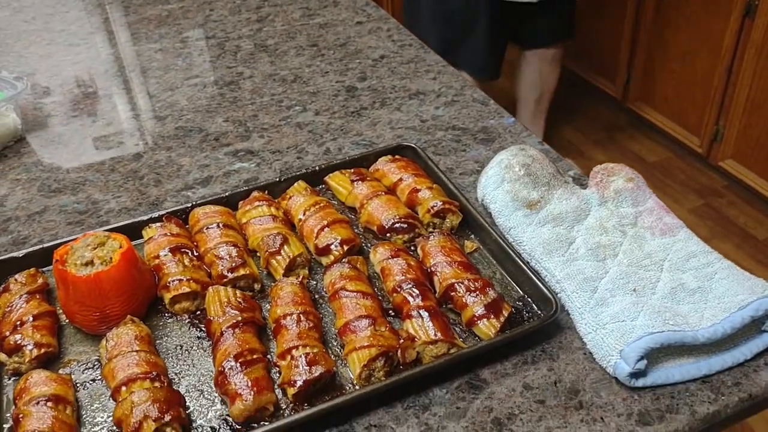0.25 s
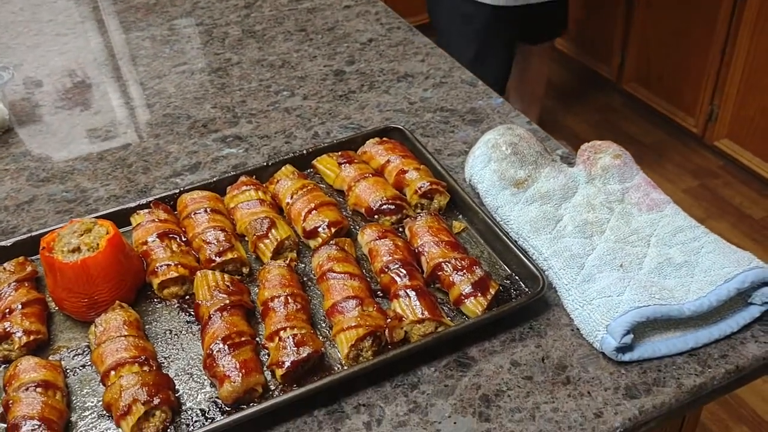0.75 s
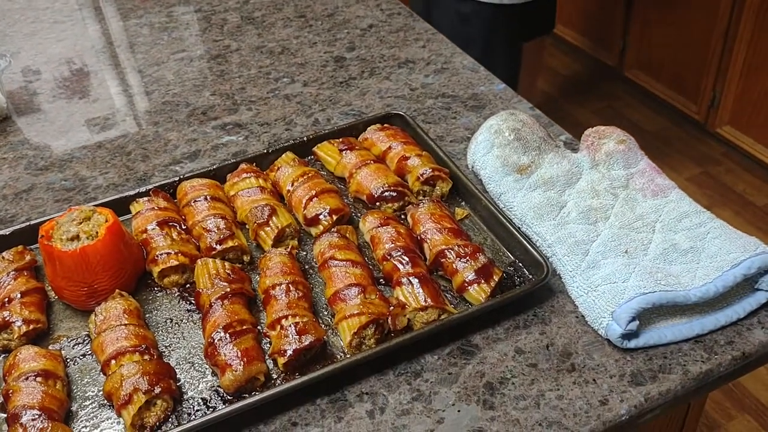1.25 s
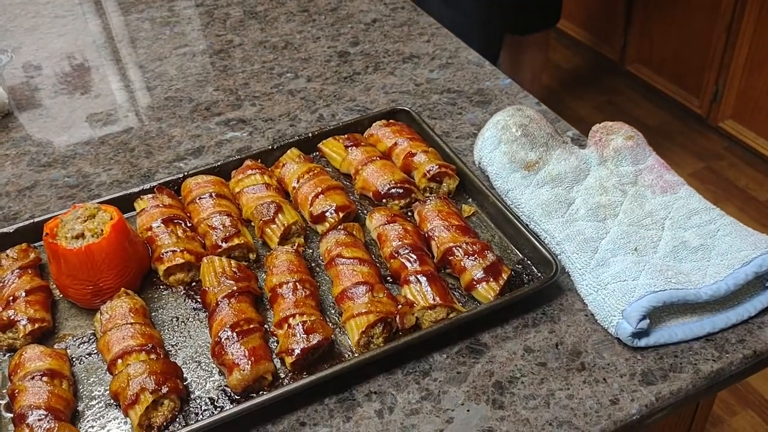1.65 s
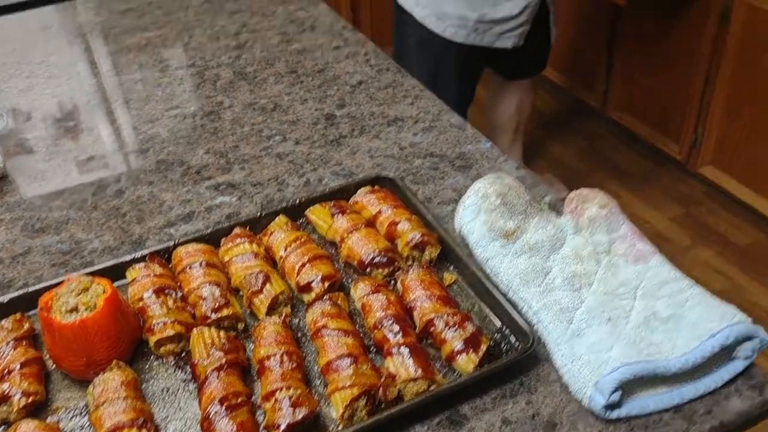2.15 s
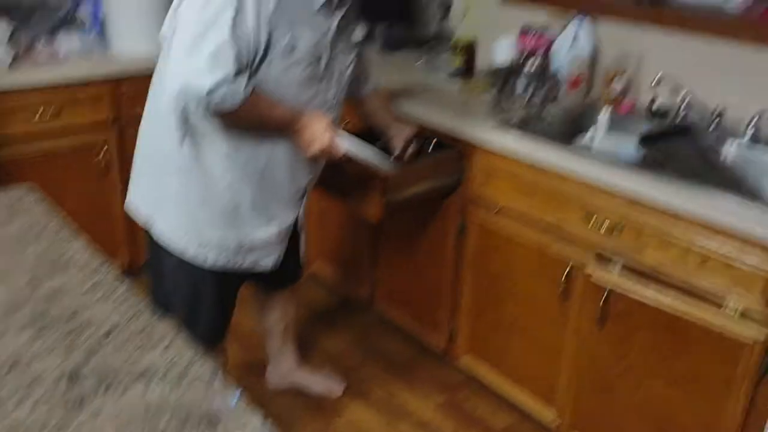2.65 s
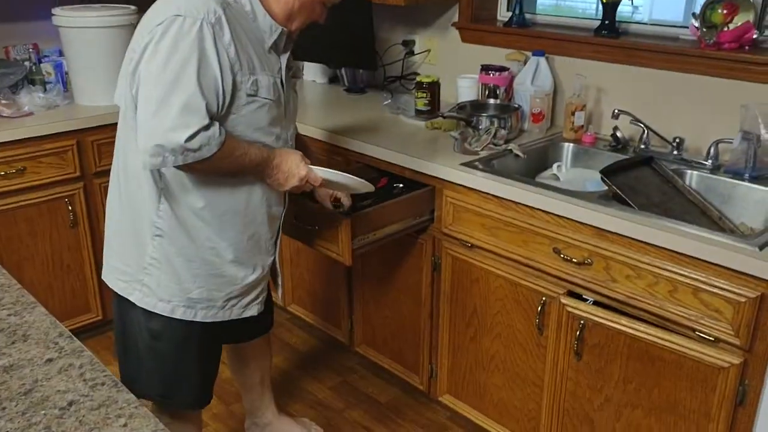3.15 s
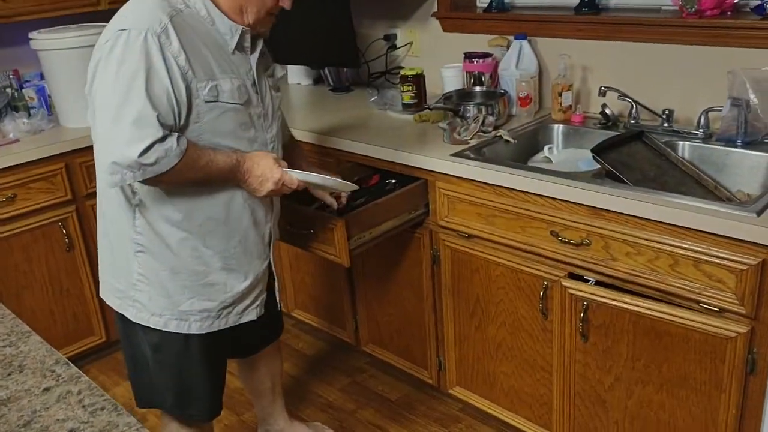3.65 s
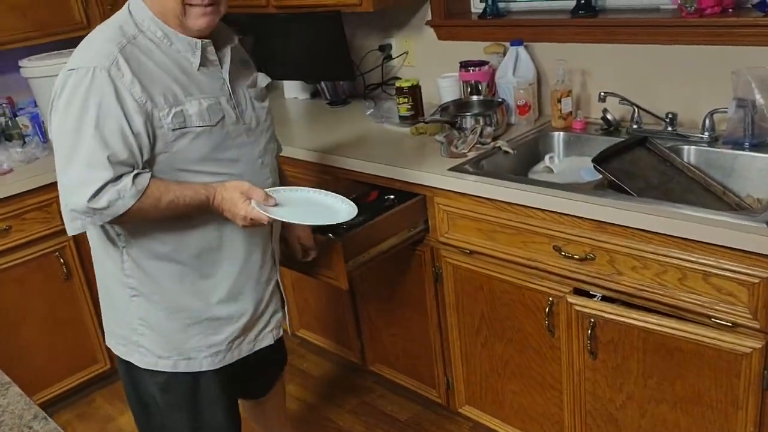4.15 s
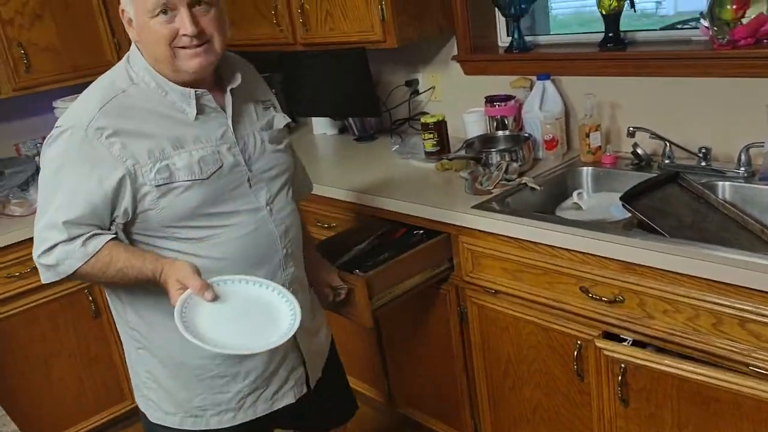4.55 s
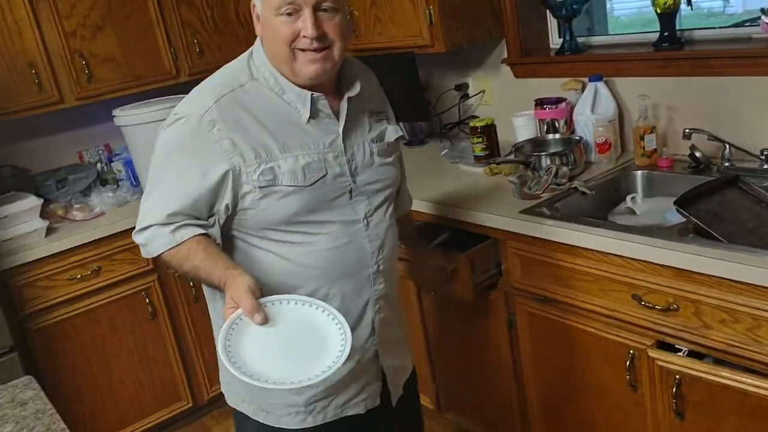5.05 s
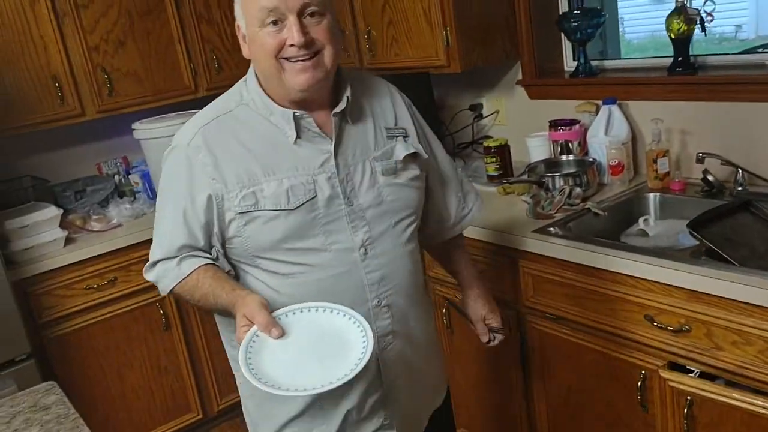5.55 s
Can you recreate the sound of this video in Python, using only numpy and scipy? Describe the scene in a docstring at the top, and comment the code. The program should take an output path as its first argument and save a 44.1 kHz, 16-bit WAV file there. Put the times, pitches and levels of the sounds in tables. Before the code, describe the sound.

Someone opens a wooden cutlery drawer, stirs through rattling steel pieces, and shuts it with a hard thud in a small kitchen.

```python
"""A small hard kitchen: a wooden drawer is pulled open, a hand rummages in the cutlery, the drawer is pushed shut.
Trains of tiny contacts, shaped by spectra, make the boom and clatter of the box and the hiss and scrape of steel.
Noise bursts through the modes of the box make knocks; struck modes, decaying sines and gliding rough tones
make the rattle, rings and squeaks, and short bursts make the ticks. Steady air noise and two sines are
the room with its refrigerator; feedback delays reverberate the knocks and ticks."""
import sys
import numpy as np
from scipy import signal
from scipy.fft import rfft, irfft, next_fast_len
from scipy.io import wavfile

SR = 44100
rng = np.random.default_rng(int(sys.argv[2]) if len(sys.argv) > 2 else 0)


def to_wav(sig):
    """Store sig (one row per channel, or 1-D mono) as 16-bit WAV at the path in sys.argv[1].

    Samples outside -1..1 are clipped; the rate is SR.
    """
    pcm = np.clip(np.atleast_2d(sig), -1, 1) * 32767
    pcm = np.round(pcm).astype(np.int16)
    wavfile.write(sys.argv[1], SR, pcm.T)  # frames by channels


N = 256123

# Resonances of the wooden box. Each row: frequency in Hz, width in Hz, level in dB.
BOX_MODES = [(75, 56, -54), (149, 24, -4), (174, 5.7, -8.5), (232.4, 18, 2), (298, 43, 4.5),
             (330, 34, -29.5), (400, 7, -24.5), (528, 12, -14.5), (642, 43, -19.5), (844, 200, 6.5),
             (985, 61, -4), (1175, 32, -13), (1660, 45, -29.5), (1910, 15, -10), (2120, 93, -6.5),
             (2338, 230, -12.5)]


def from_db(db):
    """Amplitude factor for a level in dB."""
    return 10 ** (np.asarray(db) / 20)


def rms_one(x):
    """Scale a sound to an rms of 1."""
    return x / np.sqrt(np.mean(x ** 2) + 1e-20)


def in_time(rows):
    """Draw straight lines through rows of (seconds, values..), one curve a column."""
    seconds, *columns = np.transpose(rows)
    return [np.interp(np.arange(N) / SR, seconds, column) for column in columns]


def at_hz(points, hz):
    """Read a curve of (Hz, value) along a logarithmic frequency axis."""
    point_hz, values = np.array(points).T
    return np.interp(np.log(hz), np.log(point_hz), values)


def panned(x, pan_db):
    """Left and right, with the left louder than the right by pan_db."""
    return x * from_db(np.multiply.outer([.5, -.5], pan_db * np.ones(N)))


def filtered(x, order, hz, kind):
    """Butterworth filter of the given kind, with its corner or corners in Hz."""
    return signal.sosfilt(signal.butter(order, hz, kind, fs=SR, output="sos"), x)


def ring(clicks, hz, t60):
    """A two-pole resonator: a unit click sets a decaying sine of starting height about 1 ringing."""
    radius, angle = from_db(-60 / (t60 * SR)), 2 * np.pi * hz / SR
    poles = [1, -2 * radius * np.cos(angle), radius * radius]
    return signal.lfilter([0, np.sin(angle)], poles, clicks + 1e-18)   # tiny offset avoids slow denormals


def ring_box(bumps, above_hz=0):
    """Bumps ring the modes of the box above a frequency; wider modes die sooner."""
    return sum(from_db(db) * ring(bumps, hz, 2.2 / width) for hz, width, db in BOX_MODES if hz > above_hz)


def grains(per_s, spread_db):
    """Random tiny contacts of uneven size and either sign, as a click train."""
    sizes = from_db(spread_db * np.minimum(rng.exponential(1, N), 5))
    signs = rng.choice([-1, 1], N)
    return sizes * signs * (rng.random(N) < per_s / SR)


def coloured(mid, side, spectrum):
    """Two trains shaped to a spectrum and mixed to left and right by their likeness; rms 1."""
    # How alike left and right are. Each row: frequency in Hz, likeness (held to 0-1 below).
    likeness = [(60, 0.5), (180, 1), (550, 0.7), (1650, 0.38), (4970, 0.27), (15000, -2.5)]
    size = next_fast_len(N)
    hz = np.maximum(np.arange(size // 2 + 1) * SR / size, 1)
    alike = np.clip(at_hz(likeness, hz), 0, 1)
    shared = np.sqrt(1 + alike) * rfft(mid, size)
    opposed = np.sqrt(1 - alike) * rfft(side, size) * [[1], [-1]]
    shaped = (shared + opposed) * from_db(at_hz(spectrum, hz))
    return rms_one(irfft(shaped, size)[:, :N])


def rolling(column):
    """Gain of one layer while the drawer rolls, left and right; levels glide from row to row."""
    # The drawer shifts, rolls out, then back in: three lists of rows.
    # Each row: time in seconds, boom of the panels in dB, clatter of the floor in dB, hiss of the runners in dB.
    rolls = [
        [(0.0, -44.5, -44.5, -55), (0.06, -51, -47.5, -74), (0.09, -73, -61, -80), (0.2, -77, -65.5, -100)],
        [(0.40, -59, -66, -95), (0.42, -32.5, -67, -95), (0.56, -45, -47.5, -80), (0.69, -54, -45, -39.5),
         (0.755, -45, -39, -46.5), (0.81, -46, -36.5, -35), (0.86, -38, -35.5, -41), (0.98, -37.5, -37, -35),
         (1.04, -39, -39.5, -41), (1.13, -47, -45, -37.5), (1.36, -54.5, -51, -50), (1.4, -62, -57, -54),
         (1.7, -69, -72.5, -100)],
        [(4.5, -80, -68, -60), (4.57, -70, -60, -60), (4.65, -63, -59, -50), (4.74, -55, -47, -44.5),
         (4.87, -41.5, -41, -37.5), (4.95, -49, -41.5, -41), (4.98, -36.5, -34.5, -38.5), (5.02, -39, -40, -41),
         (5.12, -35.5, -36.5, -44), (5.21, -40, -38.5, -43.5), (5.385, -48.5, -40.5, -56),
         (5.44, -40.5, -40.5, -58), (5.76, -75, -69, -100), (5.78, -70, -73, -100)],
    ]
    level_db = in_time(sum(rolls, []))[column]
    return panned(from_db(level_db), -1)


def stirring(layer):
    """Gain of one layer, left and right: each stir rises, holds and falls; stirs add in power."""
    # The heap is stirred or jolted. Each row: start in seconds, rise in seconds, hold in seconds, hiss in dB,
    # scrape in dB, clatter in dB, boom in dB, left minus right in dB.
    stirs = [(0.101, 0.026, 0.11, -50.5, -61.5, -78, -77, -2),
             (0.169, 0.07, 0.024, -46.5, -54, -65, -73, -2),
             (0.414, .003, 0.033, -61.5, -59.5, -58, -70, -2),
             (1.132, 0.0064, 0.047, -33, -49, -38.5, -39, -3),
             (1.182, 0.029, 0.064, -26, -59, -45, -48, -2), (1.774, 0.0082, 0.0091, -88, -83, -82, -61, -1),
             (1.812, 0.012, .005, -56, -64.5, -78, -59, -2),
             (1.857, 0.086, 0.043, -45.5, -52, -57.5, -54.5, -1.5),
             (2.125, .007, 0.03, -43, -58, -59.5, -59.5, -2.5),
             (2.17, 0.024, 0.069, -56.5, -57.5, -65, -62, -1),
             (2.276, 0.014, .01, -30.5, -48.5, -55, -54, -2),
             (2.289, 0.012, 0.076, -41.5, -52, -49, -46.5, -1.5),
             (2.421, 0.028, 0.12, -62, -47, -62, -56, 9.5),
             (2.474, 0.007, 0.1, -43.5, -46, -47.5, -53.5, 0.5),
             (2.54, 0.0085, 0.12, -19, -41, -37, -45.5, -1.5),
             (2.662, 0.036, 0.039, -31.5, -37.5, -42, -47, 2), (3.0, 0.07, 0.044, -91, -87, -71, -67, 4),
             (3.193, 0.04, 0.12, -68, -64.5, -65.5, -79, 5.5),
             (3.338, 0.034, .05, -52.5, -48.5, -50.5, -70, 4.5),
             (3.383, .07, 0.043, -54, -47, -43.5, -62, 1.5),
             (3.425, 0.0078, 0.028, -70, -60, -57, -56.5, 1.5), (3.54, 0.01, 0.028, -56, -59, -52, -64, 6),
             (3.574, 0.006, 0.036, -48, -45.5, -50.5, -67, -0.5),
             (3.609, 0.019, 0.039, -38, -63, -44.5, -66, -1),
             (3.664, 0.033, 0.014, -43.5, -64, -42.5, -58, -0.5),
             (3.763, 0.0045, 0.073, -57, -48, -35.5, -73, -1.5),
             (3.786, .004, .04, -44.5, -47, -47, -76, 0), (3.832, 0.0088, .045, -33, -35, -37.5, -57, -2),
             (4.091, 0.0075, 0.19, -63.5, -57, -59.5, -69, 2.5),
             (4.232, 0.017, 0.058, -31.5, -53, -47, -49.5, -1.5),
             (4.329, 0.0099, 0.017, -34.5, -53, -49.5, -65, -1),
             (4.352, .012, 0.035, -37.5, -54.5, -47, -60, -1), (4.42, .01, 0.054, -55, -56, -69, -69, -2.5),
             (5.235, 0.0029, 0.0046, -38, -61, -36, -52, -3),
             (5.442, 0.04, 0.051, -27, -33, -35, -32, -1.5),
             (5.535, 0.017, 0.077, -31.5, -49, -41.5, -57, -1.5),
             (5.73, 0.028, 0.097, -65, -56.5, -73, -73, 5)]
    # Speed at which each layer dies away after the hold, in dB per second.
    fall_db_per_s = dict(hiss=255.5, scrape=172, clatter=131.5, boom=127.5)
    climb_db = 26.5   # gained during the rise
    column = 3 + list(fall_db_per_s).index(layer)
    power, t = np.zeros((2, N)), np.arange(SR // 2) / SR
    for row in stirs:
        start, rise, hold = max(round(row[0] * SR), 0), max(row[1], .001), max(row[2], 0)
        climb = climb_db * np.maximum(1 - t / rise, 0)
        fall = fall_db_per_s[layer] * np.maximum(t - rise - hold, 0)
        level_db = row[column] - climb - fall
        # from_db of a doubled level is a power; half the pan goes to each side
        stir = from_db(2 * level_db + np.array([[1], [-1]]) * row[-1])
        power[:, start:start + len(t)] += stir[:, :N - start]
    return np.sqrt(power)


def room_tone():
    """Steady air noise, with the refrigerator compressor's mains hum and motor tone as two sines."""
    # Colour of the air noise. Each row: frequency in Hz, relative level in dB per Hz.
    air_colour = [(15, -64), (25, -41), (64, -28.5), (95, -20.5), (125, -9), (190, -9), (269, 0.5),
                  (426, -8.5), (543, -13.5), (751, -9.5), (1040, -22), (2980, -21.5), (4350, -21),
                  (11200, -30), (14300, -34.5), (15900, -43)]
    air_db = -63
    tones = [(119, -72), (137, -72)]   # hum, then motor: frequency in Hz, rms level in dB
    air = coloured(rng.standard_normal(N), rng.standard_normal(N), air_colour)
    t = np.arange(N) / SR
    hum = sum(from_db(db) * np.sqrt(2) * np.sin(2 * np.pi * hz * t) for hz, db in tones)
    return from_db(air_db) * air + hum


def box():
    """Rollers and load jolt the box with dense small bumps; its panels boom, its thin floor clatters and rings."""
    # Colour of the booming panels. Each row: frequency in Hz, relative level in dB per Hz.
    boom_colour = [(24, -72.5), (40, -35), (59, -42.5), (151, -3), (204, -9.5), (280, -2), (294, 1.5),
                   (332, -26), (353, -6.5), (387, -2), (450, -7), (580, -27.5), (990, -120)]
    # Colour of the clattering floor. Each row: frequency in Hz, relative level in dB per Hz.
    clatter_colour = [(260, -26), (450, -4), (484, -12), (533, -3.5), (604, 0), (917, -2), (1650, 0),
                      (1830, 0.5), (2600, -6), (3380, -13.5), (5720, -120)]
    boom = coloured(grains(1500, 3.9), grains(1700, 1.5), boom_colour)
    bumps = grains(400, 4.63) + 0.36 * grains(520, 4.4) * [[1], [-1]]
    floor = ring_box(bumps, above_hz=450)
    clatter = coloured(grains(2500, 2.3), grains(2800, 3.7), clatter_colour)
    clatter = rms_one(clatter + from_db(-9) * rms_one(floor))
    boom_gain = np.hypot(rolling(column=0), stirring("boom")).mean(axis=0)   # same gain on both sides
    clatter_gain = np.hypot(rolling(column=1), stirring("clatter"))
    return boom_gain * boom + clatter_gain * clatter


def heap(count):
    """Many damped modes, each struck often and unevenly, heard apart left and right; rms 1."""
    # Strength of the modes of the cutlery. Each row: frequency in Hz, relative level in dB per Hz.
    mode_strength = [(880, -41.5), (1500, -5.5), (2500, 6.5), (4130, -4.5), (5760, -6.5), (6810, -5),
                     (9420, -8), (11000, -17.5), (14500, -4), (15700, -10.5)]
    out = np.zeros((2, N))
    for hz in np.geomspace(1500, 15500, count) * rng.uniform(0.94, 1.02, count):
        tone = ring(grains(50, 4.2), hz, .09)
        apart = np.array([tone, np.roll(tone, rng.integers(3000))])
        # modes lie further apart higher up, so each carries a wider band
        out += from_db(at_hz(mode_strength, hz)) * np.sqrt(hz) * apart
    return rms_one(out)


def steel():
    """Dense contacts hiss and scrape; in a stir, loose pieces turn a share of it into ringing."""
    # Share of a stir's steel power that is loose pieces ringing. Each row: time in seconds, share from 0 to 1.
    loose = [(0.0, 0.21), (2.0, 0.16), (2.6, 0.33), (3.6, 0.9), (4.45, 0.34), (5.5, 0.36)]
    # Colour of the hiss. Each row: frequency in Hz, relative level in dB per Hz.
    hiss_colour = [(3240, -33), (5500, -17), (5960, -63.5), (6450, -4.5), (7280, -29), (8420, 0),
                   (8650, -7.5), (9210, 4.5), (11200, -12.5), (11800, -8), (13900, -4.5), (15400, -0.5),
                   (15900, -5)]
    # Colour of the scrape. Each row: frequency in Hz, relative level in dB per Hz.
    scrape_colour = [(1180, -20), (2000, 3.5), (3930, 2.5), (4380, -0.5), (4860, -2), (5800, -1.5),
                     (6500, -2), (8450, 3), (14300, -120)]
    share = np.clip(in_time(loose)[0], 0, 1)
    rattle = heap(count=140)
    high_rattle = rms_one(filtered(rattle, 4, 6000, "high"))
    low_rattle = rms_one(filtered(rattle, 4, 6000, "low"))
    hiss = coloured(grains(12000, 2.18), grains(17000, 1.66), hiss_colour)
    scrape = coloured(grains(5000, 1.48), grains(4400, 3.16), scrape_colour)
    roll_hiss, stir_hiss, stir_scrape = rolling(column=2), stirring("hiss"), stirring("scrape")
    # rolling scrapes 7 dB below the hiss of the runners and 14 dB below the clatter
    roll_scrape = np.hypot(from_db(-7) * roll_hiss, from_db(-14) * rolling(column=1))
    hiss_gain = np.hypot(roll_hiss, np.sqrt(1 - share) * stir_hiss)
    scrape_gain = np.hypot(roll_scrape, np.sqrt(1 - share) * stir_scrape)
    ringing = np.sqrt(share) * (stir_hiss * high_rattle + stir_scrape * low_rattle)
    return hiss_gain * hiss + scrape_gain * scrape + ringing


def knocks():
    """A contact and a run of bumps, softened by the wood, ring the box."""
    # Blows on the wood. Each row: start in seconds, peak in dB, dullest Hz, brightest Hz,
    # ringing of the box against the contact in dB, rise in seconds, length of the run of bumps in seconds.
    blows = [(0.289, -45, 249, 900, -25, .0003, 0.00081), (0.346, -51.5, 250, 1000, -19, .0003, 0.0012),
             (0.414, -16.5, 100, 2780, 9, 0.01, 0.045), (2.424, -33, 299, 1200, -12, .0003, .001),
             (2.232, -49, 298, 1240, -10, .0003, 0.00089), (2.697, -36, 151, 500, -14, 0.00092, 0.0058),
             (2.824, -37, 1100, 1980, -9, .0003, 0.0016), (3.359, -38.5, 388, 1000, -25, 0.00027, 0.00074),
             (4.698, -37.5, 300, 1000, -22, 0.00033, 0.0014),
             (4.859, -30.5, 295, 970, -17, 0.00024, 0.00044), (5.441, -5, 154, 2260, -5.5, 0.00054, 0.043)]
    out, t = np.zeros(N), np.arange(20000) / SR
    for s, peak_db, dull_hz, bright_hz, body_db, rise, run in blows:
        decay = np.exp(-t / min(run, 0.0055)) + .5 * np.exp(-t / max(run, .001))
        bumps = rng.standard_normal(len(t)) * decay
        bumps *= 1 - np.exp(-t / max(rise, .0001))
        contact = filtered(bumps, 4, [dull_hz, bright_hz], "band")
        body = filtered(ring_box(bumps), 4, bright_hz * 1.11, "low")
        start = round(s * SR)
        blow = (rms_one(contact) + from_db(body_db) * rms_one(body))[:N - start]
        out[start:start + len(t)] += from_db(peak_db) * blow / np.abs(blow).max()
    return out


def kitchen(x):
    """Reverberation: eight feedback delays a side, duller on every round, stepped block by block."""
    t60_s, wall_cut_hz = .52, 3550   # decay time before the dulling; corner of the dulling on each round
    out, dull = np.zeros((2, N)), np.exp(-2 * np.pi * wall_cut_hz / SR)
    lags = (rng.uniform(0.0088, 0.047, 16) * SR).astype(int)
    for k, lag in enumerate(lags):
        loop, gain, state = x.copy(), from_db(-60 * lag / SR / t60_s), [0.]
        for i in range(lag, N, lag):
            back, state = signal.lfilter([gain * (1 - dull)], [1, -dull], loop[i - lag:i], zi=state)
            loop[i:i + lag] += back[:N - i]
        out[k % 2] += (loop - x) * (-1) ** (k // 2)   # echoes alone, in alternating sign
    return out


def rings():
    """Freed pieces ring on one mode, wavering as they touch their neighbours."""
    # Pieces and panels left ringing. Each row: start in seconds, peak in dB before the waver, frequency in Hz,
    # 60 dB decay time in seconds, left minus right in dB.
    pieces = [(0.432, -15.5, 330.6, 0.35, -0.5), (0.43, -29.5, 182, 0.3, 4), (1.205, -33, 9400, 0.24, -25),
              (2.557, -34, 8921, .28, -6), (2.555, -32.5, 13710, 0.3, -35), (2.559, -31.5, 305, .5, 3),
              (2.56, -47, 6352, .6, -7), (2.558, -32.5, 10750, .3, -25), (3.45, -49, 9700, 0.12, -7),
              (3.586, -35.5, 6540, 0.19, 5), (3.591, -36, 1904, 0.153, 2), (3.63, -41, 7750, .2, -1),
              (3.846, -31, 403, 0.39, 5.5), (3.851, -50.5, 457, 0.42, -44), (3.845, -33.5, 7380, 0.39, 0),
              (3.851, -31, 6900, 0.17, -4), (3.865, -26.5, 7800, 0.134, 4), (4.251, -36, 9600, 0.17, -14),
              (4.335, -32, 9520, 0.27, -18), (4.366, -32, 7340, 0.32, 2), (4.45, -49, 9400, .2, -23),
              (5.447, -43, 76.3, 0.53, -2), (5.449, -26, 167.3, 0.64, -4)]
    out = np.zeros((2, N))
    for s, peak_db, hz, t60, pan_db in pieces:
        slow_noise = signal.lfilter([1], [1, -1.99, .990025], rng.standard_normal((2, SR)))
        waver = 1 + .35 * rms_one(slow_noise)
        start = round(s * SR)
        t = np.arange(min(round(t60 * SR), SR, N - start)) / SR
        envelope = (1 - np.exp(-t / .004)) * from_db(peak_db - 60 * t / t60)
        tone = envelope * np.sin(2 * np.pi * hz * t)
        sides = from_db([[pan_db / 2], [-pan_db / 2]])
        out[:, start:start + len(t)] += tone * waver[:, -len(t):] * sides
    return out


def ticks():
    """Each tick is a very short burst of band noise."""
    # Short dry ticks and a brief scuff, close by. Each row: start in seconds, peak in dB, centre in Hz,
    # length in seconds, left minus right in dB.
    bursts = [(0.591, -44.5, 3200, 0.0039, -7), (1.138, -28, 4000, 0.0044, 1),
              (2.4, -25.5, 1500, 0.0042, 19), (2.405, -17, 4250, 0.002, 20.5),
              (2.406, -29.5, 2430, 0.019, 21), (2.479, -25.5, 4970, 0.011, 4),
              (3.142, -54.5, 2500, 0.0033, 8), (3.225, -56, 4000, 0.0034, 4),
              (3.369, -30.5, 5000, 0.0017, 20), (3.551, -36, 4900, 0.0037, 21),
              (4.102, -41.5, 3500, 0.0056, 3.5)]
    out = np.zeros((2, N))
    for s, peak_db, centre_hz, length, pan_db in bursts:
        size = max(round(length * SR), 20)
        envelope = np.pad(np.hanning(size) ** .7, (0, 1200 - size))
        band = [centre_hz / 3, min(centre_hz * 2.2, 20000)]
        burst = filtered(rng.standard_normal(1200) * envelope, 2, band, "band")
        gain = from_db(peak_db + np.array([[.5], [-.5]]) * pan_db)
        start = round(s * SR)
        out[:, start:start + 1200] += gain * burst / np.abs(burst).max()
    return out


def squeaks():
    """Stick-slip of steel on steel: a roughened tone glides in pitch, with a bright diffuse tail."""
    # Gliding metal squeaks. Each row: start in seconds, length in seconds, start Hz, end Hz,
    # level in dB before the roughness.
    glides = [(1.538, .052, 12500, 3400, -46), (1.535, .03, 13000, 15600, -52),
              (1.534, .045, 13400, 12600, -43), (1.552, .03, 9600, 9000, -50),
              (4.498, .035, 4000, 9500, -42), (4.495, .028, 11500, 15300, -36),
              (4.528, .022, 12000, 15200, -33), (4.497, .012, 9200, 8600, -41),
              (4.518, .024, 8400, 9800, -29)]
    tail_db, tail_t60_s = -3, 0.36   # energy of the tail against the direct squeak; its decay time
    out = np.zeros(N)
    for s, length, start_hz, end_hz, level_db in glides:
        size, start = round(length * SR), round(s * SR)
        rough = signal.lfilter([1], [1, -1.7, .7225], rng.standard_normal(4000))
        rough = rms_one(rough)[:size]
        phase = 2 * np.pi * np.cumsum(np.geomspace(start_hz, end_hz, size)) / SR
        edges = np.hanning(size) ** .2
        out[start:start + size] += from_db(level_db) * edges * (0.36 + rough) * np.sin(phase)
    t = np.arange(SR // 2) / SR
    tail = rng.standard_normal((2, len(t))) * from_db(-60 * t / tail_t60_s)
    tail *= from_db(tail_db) / np.sqrt(np.sum(tail ** 2) / 2)
    diffuse = signal.fftconvolve(out[None], tail, axes=1)[:, :N]
    return panned(out + diffuse, -6.5)


def scene():
    """Sum the sources, with reverberation on the knocks and ticks."""
    blows, small = knocks(), ticks()
    wet = kitchen(from_db(-9) * blows + from_db(-27) * small.mean(axis=0) + 1e-18)
    # long waves reach both microphones alike
    wide = filtered((wet[0] - wet[1]) / np.sqrt(2), 2, 750, "high")
    wet = wet.mean(axis=0) + wide * [[1], [-1]]
    return panned(blows, -2.4) + small + wet + squeaks() + box() + steel() + rings() + room_tone()


def record(dry):
    """The microphone ports differ in the treble and lose the deepest bass; the top is cut steeply."""
    right_treble_db, cutoff_hz = 5, 15950   # right over left, well above 6 kHz; edge of the full top cut
    treble = filtered(dry, 1, 6000, "high")
    tilted = dry + treble * (from_db([[-right_treble_db / 2], [right_treble_db / 2]]) - 1)
    thin = filtered(tilted, 3, 58, "high")
    return signal.sosfilt(signal.cheby2(14, 70, cutoff_hz, fs=SR, output="sos"), thin)


dry = scene()
out = record(dry)
to_wav(out)
```